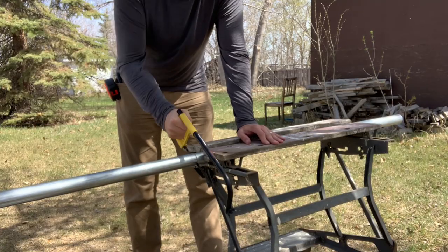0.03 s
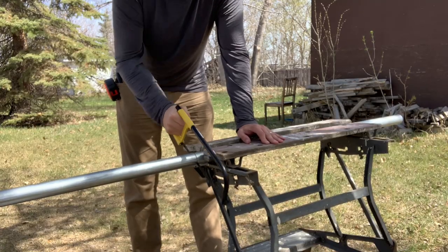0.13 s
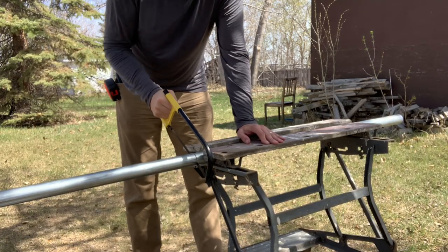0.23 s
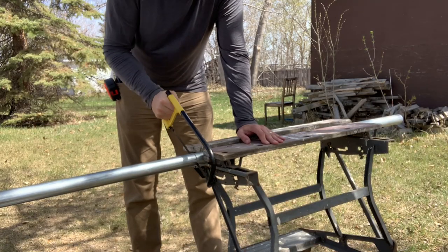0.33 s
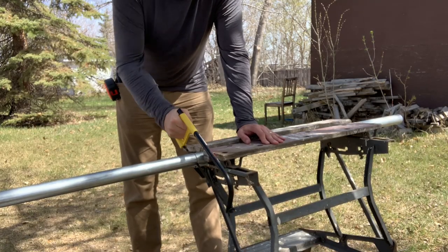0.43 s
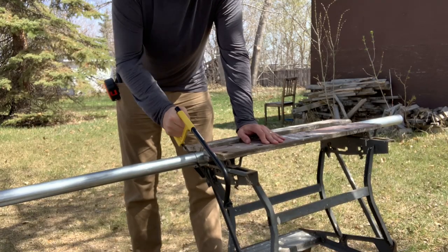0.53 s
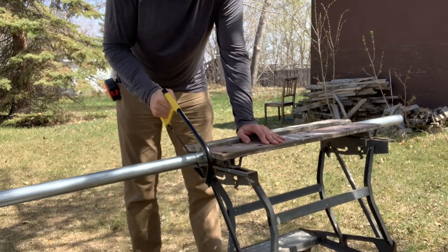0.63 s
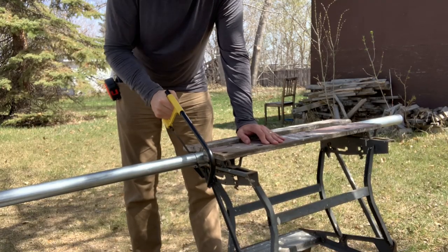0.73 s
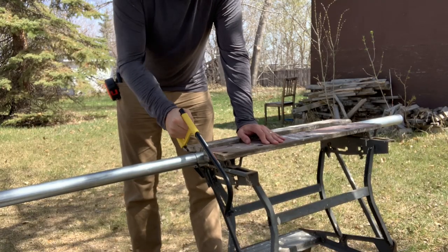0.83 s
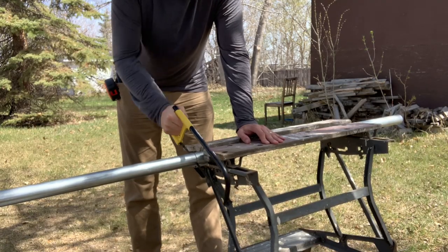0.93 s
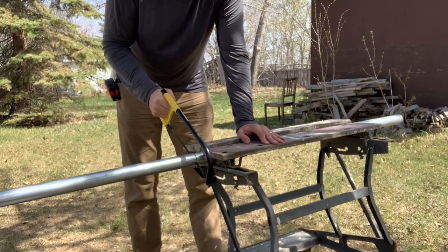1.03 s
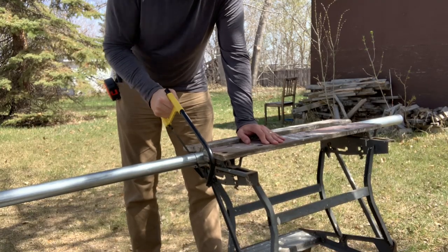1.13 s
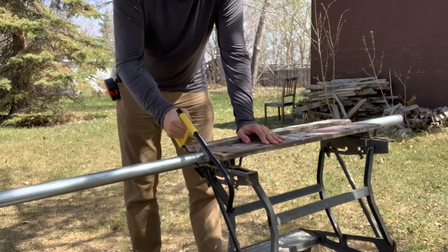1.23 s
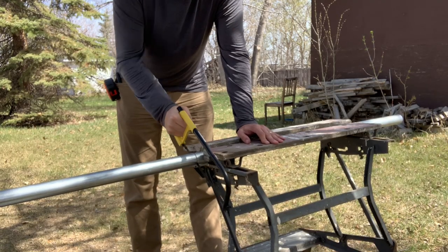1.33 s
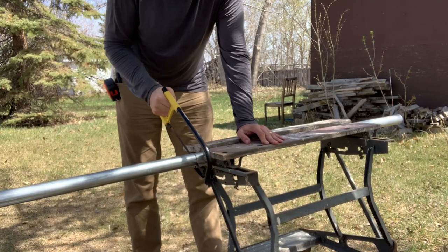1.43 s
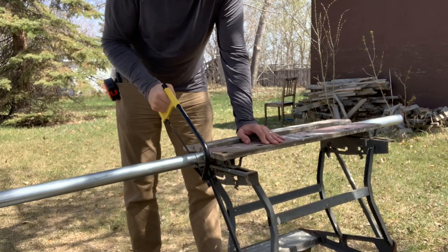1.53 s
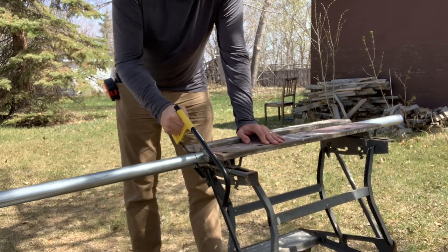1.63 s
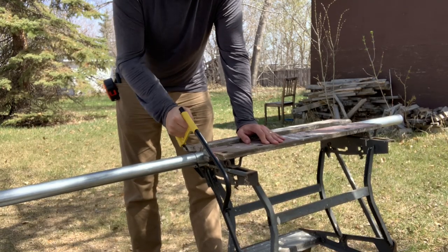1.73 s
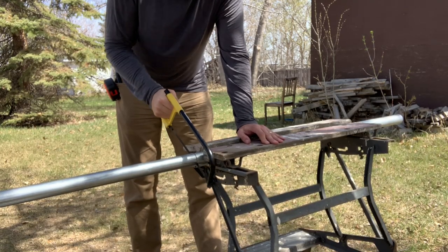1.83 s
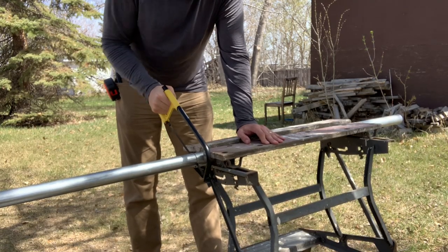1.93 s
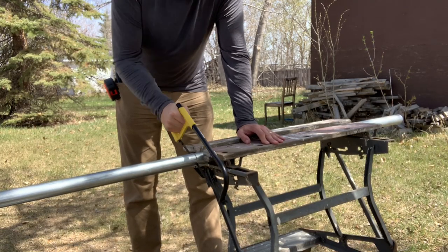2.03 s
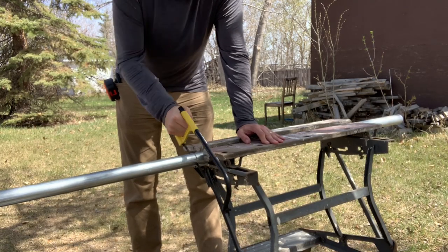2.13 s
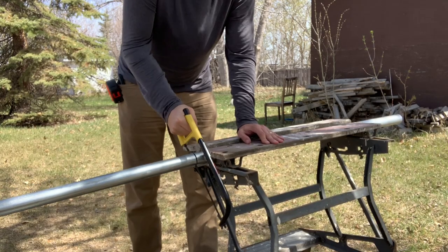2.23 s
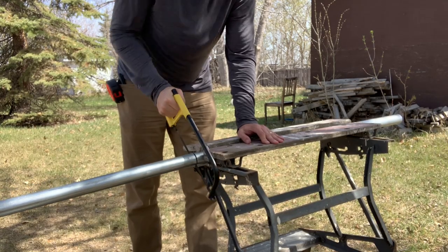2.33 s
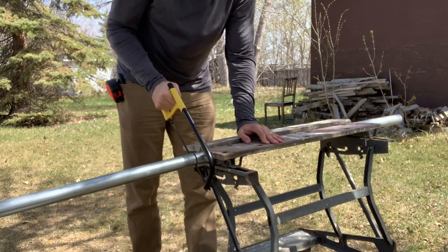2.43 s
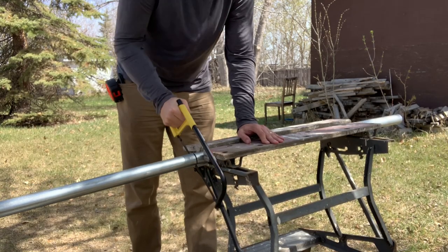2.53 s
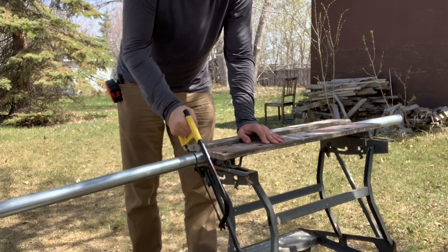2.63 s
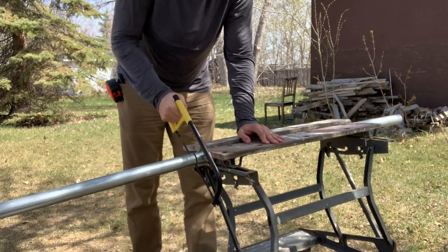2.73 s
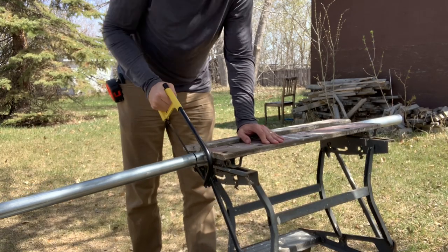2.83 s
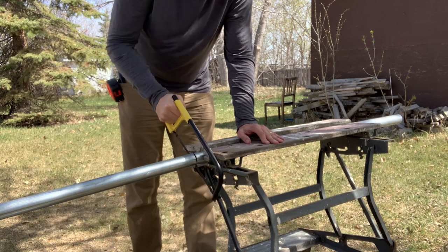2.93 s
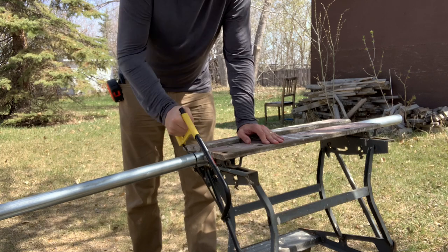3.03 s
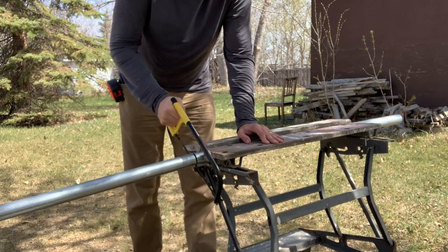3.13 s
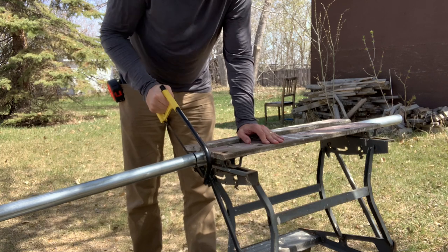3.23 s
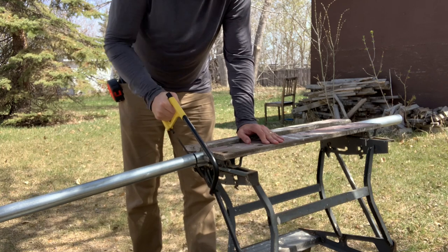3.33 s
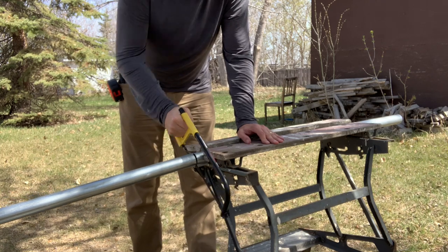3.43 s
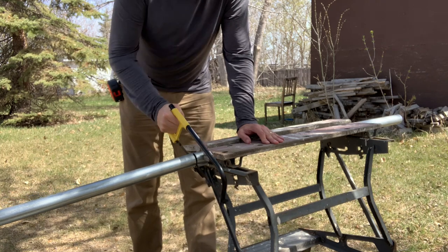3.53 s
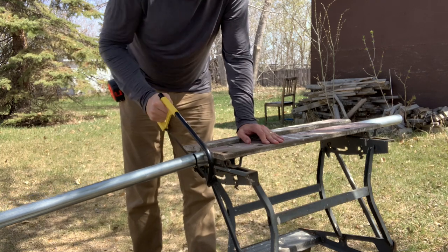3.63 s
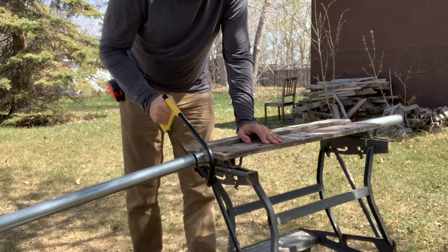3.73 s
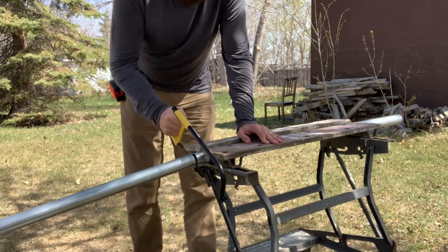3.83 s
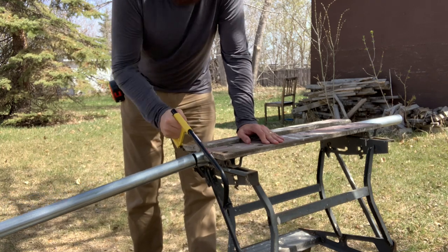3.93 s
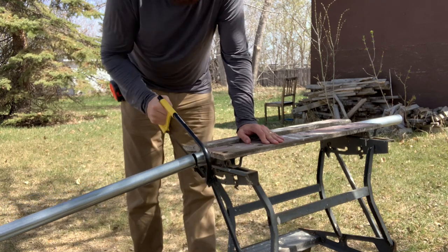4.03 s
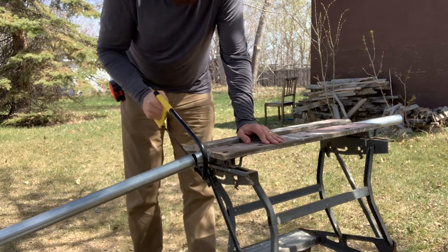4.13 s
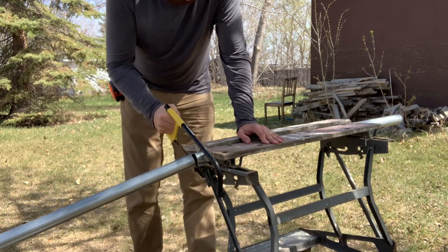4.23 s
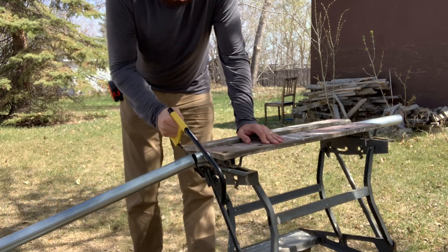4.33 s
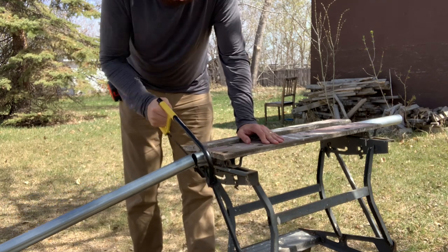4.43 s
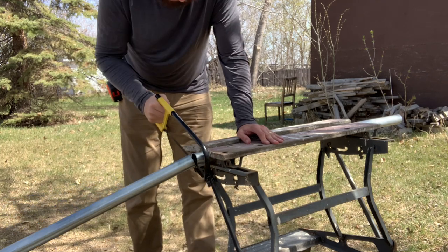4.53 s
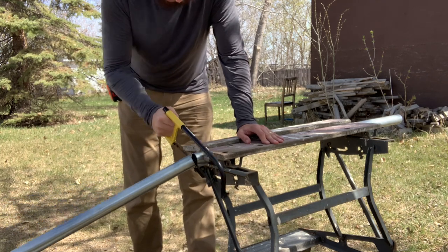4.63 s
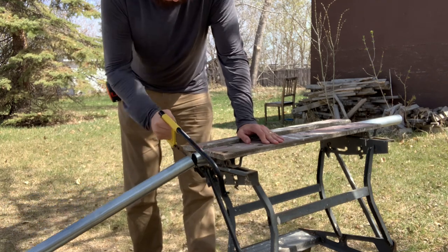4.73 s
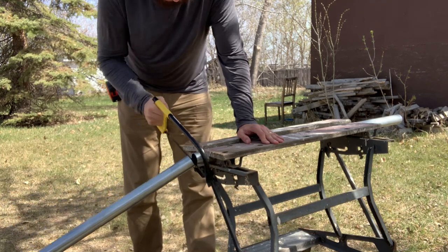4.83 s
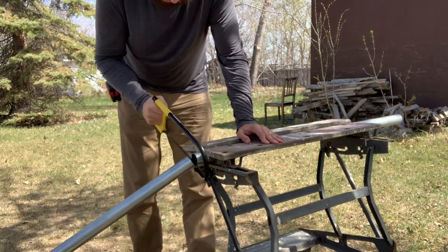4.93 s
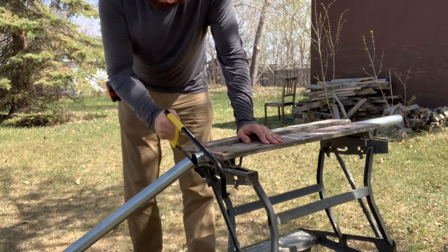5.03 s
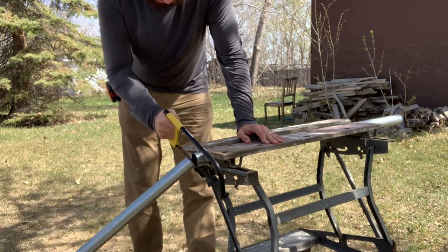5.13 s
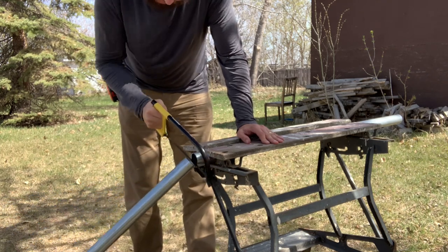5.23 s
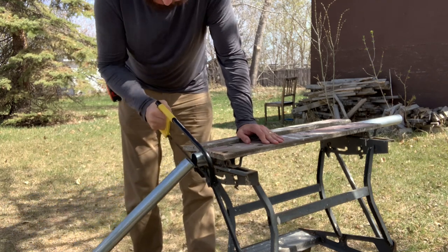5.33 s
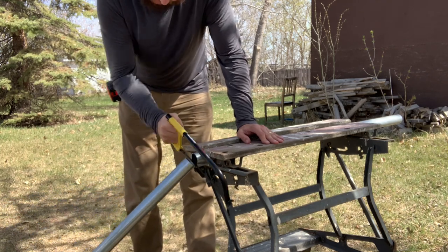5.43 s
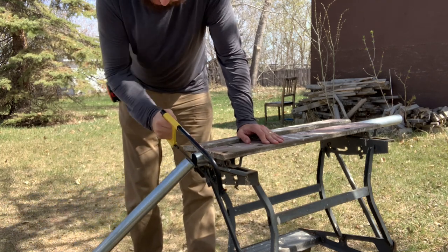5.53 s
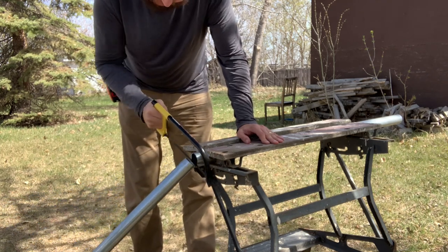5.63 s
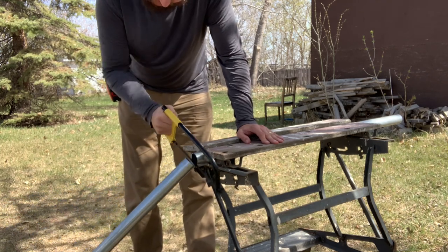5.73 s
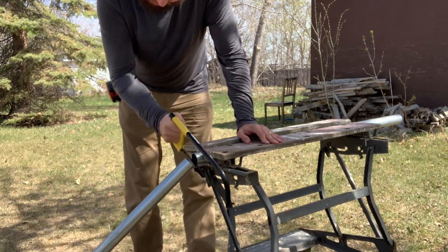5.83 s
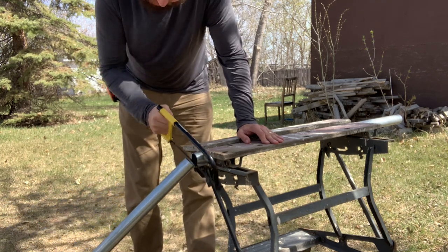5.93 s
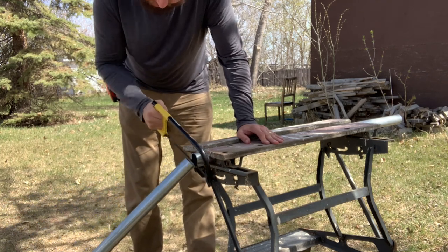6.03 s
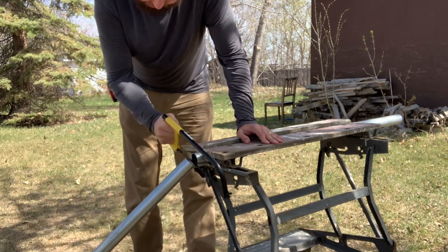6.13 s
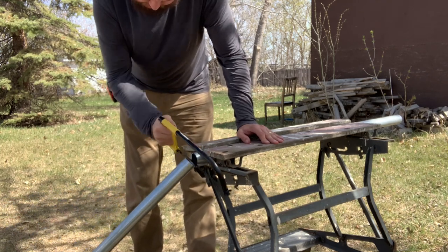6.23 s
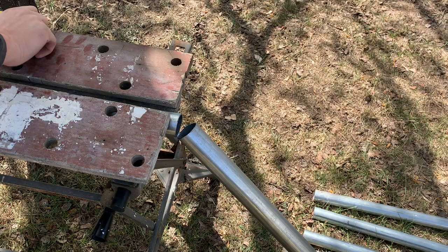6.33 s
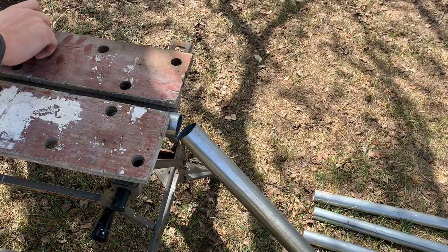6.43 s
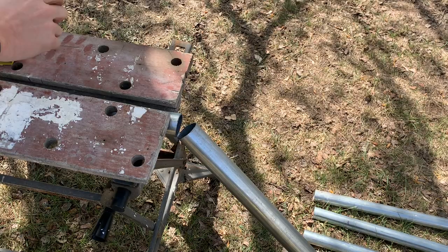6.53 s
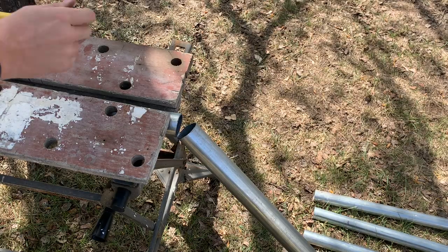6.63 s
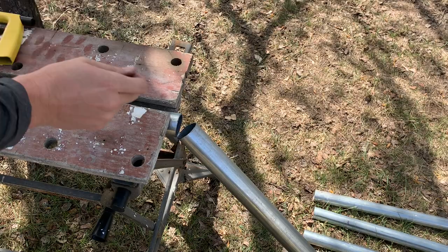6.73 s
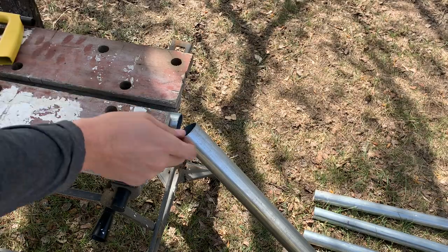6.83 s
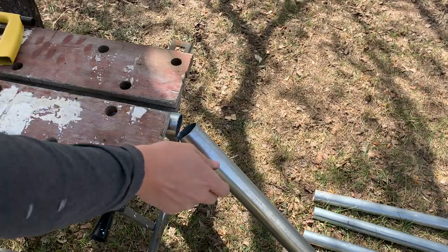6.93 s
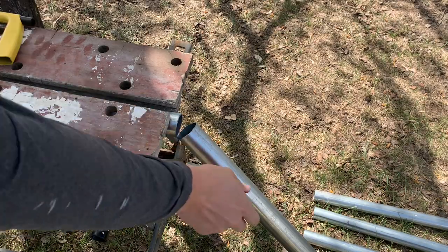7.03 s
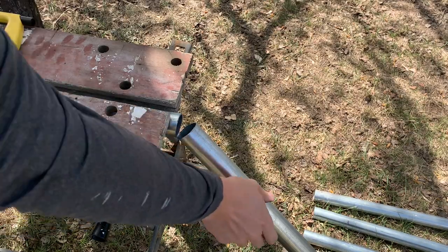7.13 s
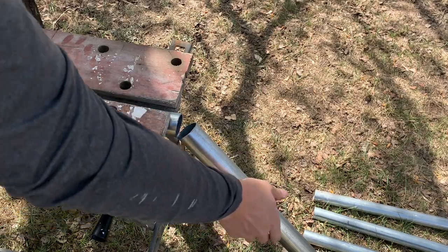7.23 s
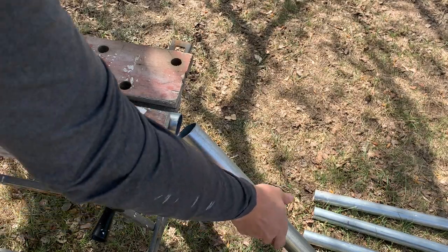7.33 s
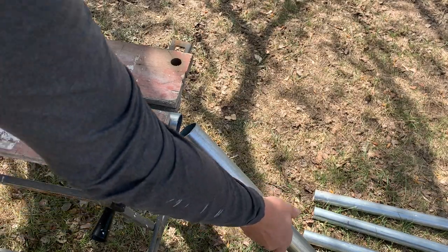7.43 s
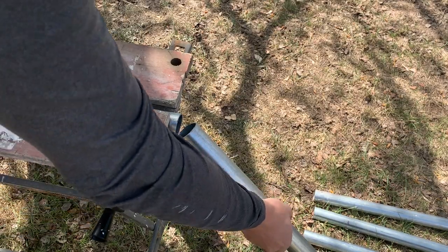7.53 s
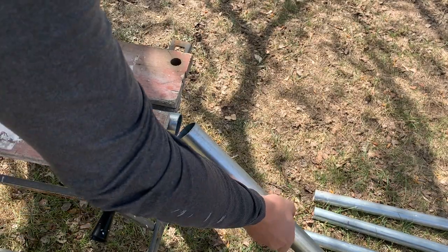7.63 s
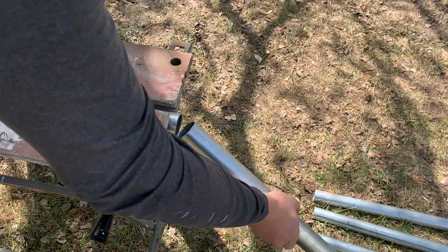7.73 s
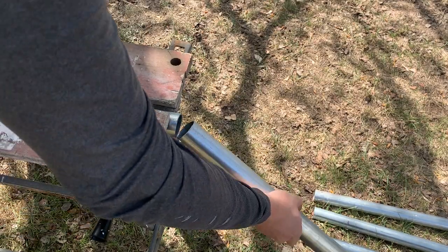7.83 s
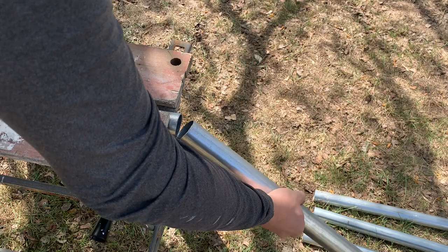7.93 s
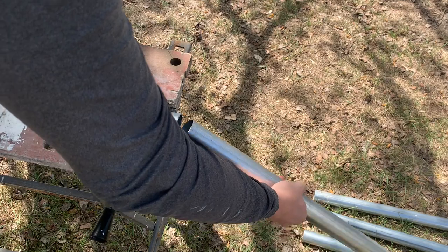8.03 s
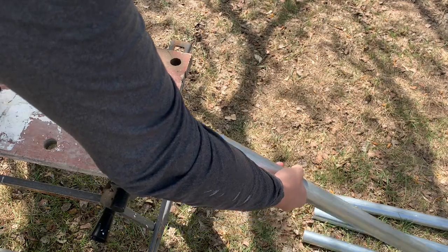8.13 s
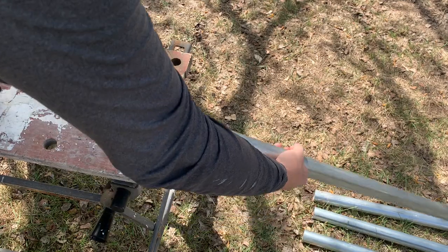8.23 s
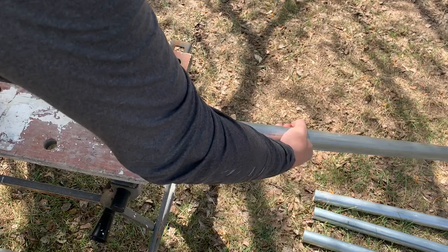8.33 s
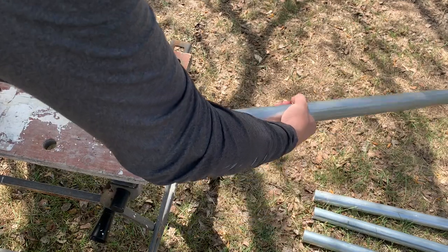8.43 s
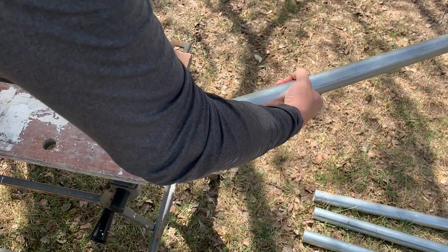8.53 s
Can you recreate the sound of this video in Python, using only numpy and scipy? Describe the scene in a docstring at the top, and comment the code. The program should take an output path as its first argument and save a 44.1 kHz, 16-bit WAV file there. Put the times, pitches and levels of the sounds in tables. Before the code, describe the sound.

Rapid metallic rasping fills the first six seconds, dry and close, slightly right of centre, with gritty catches and brief squeals around one kilohertz. Later strokes are softer but whinier. It stops abruptly in a rattling clunk on a wooden-topped bench. Then it is almost silent: low breeze puffs on the microphone, tiny knocks and sleeve rustle, a light pipe clink, and a hissing, groaning drag across dry grass.

```python
"""A hacksaw cuts a galvanized steel pipe on a folding workbench outdoors, about five strokes a second.
Each tooth tears a chip: noise pulsed at the tooth rate rings resonances of pipe, blade and cut lip.
Whine and squeals are sine tones. The pipe sags as the cut opens, then the saw drops through onto the bench:
bursts of noise and ringing steel legs. Last, the loose end clinks (decaying modes) and is dragged over
dry grass (filtered noise, gliding groans), in a light breeze of low, swelling noise."""
import sys
import numpy as np
from scipy import signal
from scipy.fft import rfft, irfft, next_fast_len
from scipy.io import wavfile
from scipy.ndimage import uniform_filter1d, map_coordinates

SR = 44100
rng = np.random.default_rng(int(sys.argv[2]) if len(sys.argv) > 2 else 0)


def put_to_file(sound):
    """Save the sound as 16-bit audio at rate SR, in the file named by the first command-line argument."""
    columns = np.atleast_2d(sound).T  # one column per channel
    safe = np.clip(columns, -1, 1)
    whole_steps = np.round(safe * 32767)
    wavfile.write(sys.argv[1], SR, whole_steps.astype(np.int16))


N = 378800
T = np.arange(N) / SR  # time axis, s
SIZE = next_fast_len(N + SR // 2, real=True)  # padded transform length
HZ = np.fft.rfftfreq(SIZE, 1 / SR)  # frequency axis

THROUGH_S, REST_S = 6.372, 6.44  # the blade breaks through; the arm comes to rest
LANDED_DB_PER_S = 90  # the bench damps the blade once the saw has dropped through
# the pipe sags: [t/s, how far the cut has opened 0-1]
CUT_OPENING = [(3.9, 0), (4.8, 1)]
# blade resonances in the cut: [f/Hz, width/Hz, relative level/dB]
BLADE_IN_CUT = [(2504, 5.1, 5), (2566, 37, 2), (2673, 22, -7), (7020, 40, -8.5)]
# free edge of the cut: [f/Hz, width/Hz, relative level/dB]
CUT_LIP = [(1900, 72, 3), (1960, 49, 7), (2050, 50, -12.5)]
# the blade's free length: [f/Hz, width/Hz, relative level/dB]
FREE_BLADE = [(2472, 11, 6), (2530, 15, 5), (4656, 8.6, -2.5), (4790, 7.1, -9), (6960, 18, -2.5)]
# lines of the tooth beat; teeth set in threes add lines between the harmonics:
# [multiple of the tooth rate, relative level/dB]
TOOTH_LINES = [(3 / 3, 0), (4 / 3, -13.5), (5 / 3, -11.5), (6 / 3, -9.5), (9 / 3, -15)]
# left-right likeness of sounds from the bench: [f/Hz, likeness -1..1]
BENCH_LIKENESS = [(100, .85), (600, .7), (1200, .75), (2500, .35), (3400, .55), (5000, .2), (6500, 0),
                  (7200, -.35), (8200, -.985), (10000, -.995), (11000, -.2), (12100, .55), (12800, .98),
                  (16000, .98)]
# share of the left-right difference that is a steady phase lead of the left: [f/Hz, share -1..1]
LEFT_LEAD = [(500, .4), (1100, -.3), (1550, -.65), (2150, -.45), (2410, .8), (2840, .5), (3960, -.3),
             (4650, .65), (5200, -.3), (6700, .7), (11000, .5)]


def saw(turn_db=21, bite=0.43, rasp_db=1.4, grumble_db=-61, blade_db=.5, sing_db=-5.5, lip_db=-15):
    """Teeth strike at a rate that follows the blade's speed; each tears a chip that rings pipe, blade and lip."""
    speed, push, level = arm()
    opened = np.clip(np.interp(T, *np.transpose(CUT_OPENING)), 0, 1)
    tooth_hz, whine, blade, lip = contact(push, opened)
    # the exponent sets how closely the force follows the speed
    slack = -turn_db * (1 - speed ** 0.98)
    force = amp(level) * np.clip((THROUGH_S - T) / 0.0046, 0, 1)
    tooth = teeth(speed, tooth_hz, whine)

    # chips tear off once a tooth, in uneven sizes
    pulses = np.exp(bite * np.cos(tooth)) * amp(.7 * wobble(70))
    chips = force * amp(snags()) * unit(pulses)
    cut = metal_grain() * chips * amp(slack + rasp_db)
    # a thin pipe radiates little bass
    cut = filtered(cut, causal(amp(along([(120, -9), (330, -6), (650, 0)]))))
    sound = filtered(cut * np.sqrt(1 - opened), pipe(0))
    sound += filtered(cut * np.sqrt(opened), pipe(1))
    sound += filtered(chips * noise() * amp(1.1 * slack + blade + blade_db), body(BLADE_IN_CUT))
    sound += filtered(chips * noise() * amp(1.1 * slack + lip + lip_db), body(CUT_LIP))

    # the rocking bench grumbles under the work
    rocking = body([(150, 120, -4.5), (270, 110, 2.5), (415, 160, -0.5)])
    sound += (T < THROUGH_S) * amp(grumble_db + 2 * wobble(13)) * filtered(noise(), rocking)

    # the taut blade keeps singing through the turns
    singing = filtered(chips * noise() * amp(0.24 * slack + blade + sing_db), body(FREE_BLADE))
    sound += singing * amp(-LANDED_DB_PER_S * np.maximum(T - THROUGH_S, 0))

    tones = np.array([tooth_whine(speed, tooth, force, slack, whine) + squeals(), np.zeros(N)])
    tones = scatter(tones, t60=0.093, wet_db=-6.5)
    return stereo(sound + tones, BENCH_LIKENESS, along(LEFT_LEAD))


# pushes and pulls in turn, a push first: [start t/s, fastest t/s, level/dB]
SAW_STROKES = [(-.09, .006, -27.5), (.102, .185, -28), (.288, .408, -26.5), (.498, .621, -25.5),
               (.702, .773, -24.5), (.894, .989, -27), (1.105, 1.198, -25.5), (1.317, 1.42, -24.5),
               (1.525, 1.595, -25), (1.724, 1.808, -27), (1.924, 2.034, -25.5), (2.139, 2.19, -30),
               (2.244, 2.345, -28), (2.445, 2.561, -30), (2.659, 2.778, -31), (2.87, 2.963, -30),
               (3.074, 3.146, -25), (3.287, 3.39, -28.5), (3.493, 3.577, -27.5), (3.725, 3.857, -32.5),
               (3.928, 4.034, -29), (4.146, 4.225, -30.5), (4.333, 4.44, -33), (4.544, 4.624, -33.5),
               (4.734, 4.86, -29.5), (4.936, 5.029, -29.5), (5.115, 5.205, -32.5), (5.308, 5.384, -30),
               (5.485, 5.578, -33), (5.685, 5.769, -31.5), (5.862, 5.968, -32), (6.045, 6.124, -34.5),
               (6.225, 6.31, -29.5)]


def arm():
    """Blade speed 0-1, zero at every turn; whether it is a push (1) or a pull (0); the stroke's level in dB."""
    start, fastest, level = np.transpose(SAW_STROKES)
    marks = np.append(np.column_stack([start, fastest]), REST_S)
    quarter_cycles = np.interp(T, marks, np.arange(len(marks)))
    speed = np.abs(np.sin(np.pi / 2 * quarter_cycles))
    stroke = np.maximum(np.searchsorted(start, T, side="right") - 1, 0)
    push = uniform_filter1d(1. - stroke % 2, size=700)
    return speed, push, uniform_filter1d(level[stroke], size=700)


# tooth rate at full speed when the work starts; the arm slows as it goes on
PUSH_HZ, PULL_HZ, SLOWING_HZ_PER_S = 1294, 1151.1, 14
BITE_DB, BITE_S = 4, 0.01483  # the teeth bite most evenly at full speed: extra whine, half length
BLADE_FADE_DB_PER_S, BLADE_PUSH_DB = 1.75, 1.5  # the deepening cut damps the blade; it rings more on a push
LIP_OPENS_DB = 13  # the lip rings more once the cut is open
# whine against the stroke level, before the bite and slack of each stroke; strongest on the pulls
# while the sagging pipe holds the cut open: [t/s, push level/dB, pull level/dB]
WHINE_COURSE = [(0, -10, -8.5), (2, -8.5, -7), (3.6, -6.5, -6), (4.3, -5, 1), (5.78, -8, 2),
                (6.08, -12, -10)]


def contact(push, opened):
    """Tooth rate and the dB of whine, blade and lip, from the stroke's direction and the state of the cut."""
    tooth_hz = PULL_HZ + (PUSH_HZ - PULL_HZ) * push - SLOWING_HZ_PER_S * T
    s, pushed, pulled = np.transpose(WHINE_COURSE)
    whine = push * np.interp(T, s, pushed) + (1 - push) * np.interp(T, s, pulled)
    whine += BITE_DB * sum(swell(fastest, BITE_S) for _, fastest, _ in SAW_STROKES)
    blade = BLADE_PUSH_DB * push - BLADE_FADE_DB_PER_S * T
    return tooth_hz, whine, blade, LIP_OPENS_DB * opened


def teeth(speed, tooth_hz, whine, jitter=0.04477):
    """Phase of the tooth beat: even when the teeth bite well, ragged when they skate."""
    ragged = np.interp(whine, [-8, 4], [1.15, .35])
    # the arm is soon up to speed and brakes more gradually
    curve = np.where(np.gradient(speed) > 0, .45, .55)
    unsteady = 1 + ragged * (jitter * wobble(400) + .04 * wobble(45))
    return 2 * np.pi * np.cumsum(tooth_hz * speed ** curve * unsteady) / SR


# a tooth stalls, catches, and the rasp jumps: [t/s, extra level/dB before the fade]
TOOTH_CATCHES = [(0.347, 7.5), (.743, 5), (1.132, 6.5), (1.339, 5), (1.608, 1.5), (1.945, 2.5), (2.684, 7),
                 (3.113, 10.5), (3.746, 11), (4.77, 4), (4.994, 6)]


def snags(rise=.002, fall=.035, stall=.8):
    """Extra dB of rasp: a tooth holds the blade back, bites all at once and lets go slowly."""
    extra = np.zeros(N)
    for s, db in TOOTH_CATCHES:
        caught = (1 + np.tanh((T - s) / rise)) / 2
        extra += db * np.exp(-np.abs(T - s) / fall) * ((1 + stall) * caught - stall)
    return extra


def metal_grain():
    """Countless standing waves in the long pipe give the rasp a metallic grain, denser in the treble."""
    crowded = along([(900, 0), (3000, 1)])
    waves = filtered(unit(scatter(noise(), t60=.13, wet_db=0)), np.sqrt(crowded))
    plain = filtered(noise(), np.sqrt(np.abs(1 - crowded)))
    return shifting(waves + plain, depth_db=3.2)


def shifting(x, depth_db):
    """The contact slides along the blade, so patches of the spectrum swell and fade."""
    z = signal.stft(x, nperseg=512)[2]
    field = rng.standard_normal(z.shape[1:])
    field = uniform_filter1d(uniform_filter1d(field, size=3, axis=0), size=7, axis=1)
    gain = unit(amp(depth_db * unit(field)))
    return signal.istft(z * gain, nperseg=512)[1][:, :N]


# rasp of steel on steel: [f/Hz, level/dB with the cut tight, level/dB with the cut open], relative
STEEL_RASP = [(60, -31.5, -30.5), (203, -6, -9.5), (420, -5.5, -7.5), (760, -0.5, 0.5), (1180, 2, 7),
              (1600, 1, 6), (2190, 2, 2.5), (2940, 2, -3), (4700, 2, -1.5), (6000, 0, -2.5),
              (8300, -1.5, -5), (11600, -2.5, -4.5), (14300, -6, -6), (15800, -3.5, -8)]
# pipe resonances: [f/Hz, width/Hz, level/dB over the rasp with the cut tight, with the cut open]
PIPE_MODES = [(1013, 13, 8.5, 5.5), (1263.4, 17, 12.5, 10.5), (2703, 45, 13.5, 18), (2810, 68, 8.5, 10.5),
              (2910, 43, 11.5, -5), (3024, 18, 10, 15.5), (3150, 25, -10.5, 4.5), (3425, 120, 6.5, 10),
              (3720, 45, 5.5, -10), (3833, 30, 4.5, 15.5), (4705, 20, 9, -9), (4706, 45, 7, 16.5),
              (5350, 230, -9, 7), (5730, 46, -7.5, 10), (5935, 78, 7.5, -6), (7110, 130, 18.5, 11.5),
              (8060, 57, 12, -14), (7840, 25, -7, 16), (9020, 60, -14.5, -13.5), (11570, 43, 1, -2.5),
              (12080, 30, 6.5, 0.5), (13585, 160, 15, -8.5), (14600, 44, 5, -13.5)]


def pipe(state):
    """Response of the pipe with the cut tight (0) or open (1): resonances on the rasp, levelled in the treble."""
    peaks = sum(amp(db[state]) ** 2 / (1 + (2 * (HZ - hz) / width) ** 2) for hz, width, *db in PIPE_MODES)
    rasp = amp(along([(hz, db[state]) for hz, *db in STEEL_RASP]))
    gain = rasp * np.sqrt(1 + peaks)
    treble = (HZ > 3000) & (HZ < 12000)
    return causal(gain / np.sqrt(np.mean(gain ** 2 * treble)))


def tooth_whine(speed, tooth, force, slack, whine):
    """The beat of the teeth is an arching whine, strongest once the blade has settled into the stroke."""
    settled = np.where(np.gradient(speed) > 0, 1.75, 1.3)
    beat = sum(amp(db) * np.sin(multiple * tooth) for multiple, db in TOOTH_LINES)
    beat = unit(beat * amp(2.7 * wobble(130)))
    beat = beat * force * amp(settled * slack + whine)
    return filtered(beat, amp(along([(450, -14), (700, -3), (1000, -.5)])))


SQUEAL_DB, SQUEAL_OCTAVE_DB = -3.5, -10  # trim of all squeals; octave against the fundamental
SQUEAL_RISE_S, SQUEAL_HOLD_S, SQUEAL_T60_S = 0.0044, .018, .12  # the hold counts from the start of the rise
# the teeth lock onto a resonance of the pipe and squeal: [t/s at full level, level/dB before trim, f/Hz]
PIPE_SQUEALS = [(0.7844, -18, 1262), (1.1944, -18.5, 1264), (1.6083, -7.5, 1310), (2.014, -23, 1140),
                (2.314, -23.5, 1223), (4.0126, -22, 1112), (4.2157, -14.5, 1003), (4.6144, -21.5, 1010),
                (4.778, -24.5, 1193), (4.9965, -12.5, 1024)]


def squeals(waver=.012):
    """Short, slightly unsteady tones with their octave: attack, hold, release."""
    sound = np.zeros(N)
    drift = np.cumsum(1 + waver * wobble(200)) / SR
    for s, db, hz in PIPE_SQUEALS:
        age = np.maximum(T - s + SQUEAL_RISE_S, 0)
        release_db = -60 * np.maximum(age - SQUEAL_HOLD_S, 0) / SQUEAL_T60_S
        level = amp(db + SQUEAL_DB + release_db) * np.minimum(age / SQUEAL_RISE_S, 1)
        phase = 2 * np.pi * hz * drift
        sound += level * (np.sin(phase) + amp(SQUEAL_OCTAVE_DB) * np.sin(2 * phase))
    return sound


# the saw lands, the bench is jostled: [t/s, level/dB, t60/s]
BENCH_KNOCKS = [(6.37, -26, 0.16), (6.405, -27, 0.16), (6.874, -48.5, 0.14), (6.927, -61, 0.32),
                (7.014, -53, .05), (7.616, -40, 0.12)]
# resonances of the bench: [f/Hz, width/Hz, relative level/dB]
BENCH_MODES = [(84.7, 30, -11.5), (216, 81, -8), (367, 50, 0), (450, 49, -1), (637, 52, -1), (840, 60, -4),
               (1290, 130, -12.5), (1993, 270, -22), (3600, 1200, -32.5)]
# the bench's steel legs: [f/Hz, level/dB, t60/s]
STEEL_LEGS = [(370, -41, .5), (646, -47, .8), (838, -48, .8), (1044, -50, .3), (1200, -54, .3),
              (2519, -69, .5)]


def bench():
    """Rattling blows on the wooden top; the second, as the saw lands, leaves the steel legs ringing."""
    blows = np.zeros(N)
    for s, db, t60 in BENCH_KNOCKS:
        attack = np.clip((T - s) / 0.0022 + 1, 0, 1)
        blows += amp(db - 60 * np.maximum(T - s, 0) / t60) * attack
    top = stereo(filtered(blows * noise(), body(BENCH_MODES)), BENCH_LIKENESS)
    return top + ringing(BENCH_KNOCKS[1][0], STEEL_LEGS)


CLINK_S = 7.619  # the loose end clinks against the stub
DRAG_S, DRAG_RISE_S = 7.83, 0.37  # the pipe starts to slide and gathers speed
HOLLOW_RISE_S, HOLLOW_FADE_DB_PER_S = .15, 12  # its body sounds sooner, then less as it is lifted
# the cut ends touch: [f/Hz, relative level/dB, t60/s]
CLINK_MODES = [(436, -4, .3), (1168, 0, .17), (2471, -1, .55), (2600, -1, .45), (3747, -6, .48),
               (4613, -11, .38), (5685, -8, .2), (7940, -14, .22), (9668, -13, .22), (11020, -13, .2)]
# spectrum of the slide over dry grass: [f/Hz, relative level/dB]
GRASS_SCRAPE = [(200, -24.5), (400, -6), (800, -8.5), (1100, 1), (1800, -1), (2600, 0), (3600, -7.5),
                (5200, -12), (7200, -10.5), (9000, -21), (13500, -16.5), (15800, -26.5)]
# hollow body of the dragged pipe: [f/Hz, width/Hz, relative level/dB]
HOLLOW_PIPE = [(298, 22, 1), (390, 60, -2.5), (480, 92, -4.5), (638, 70, -5), (786, 46, -8.5),
               (1063, 49, -10.5)]
# the dragged pipe sticks and slips: [t/s, half length/s, f/Hz, glide/Hz per s, level/dB]
STICK_SLIP_GROANS = [(7.978, 0.04, 396.6, 250.5, -36.5), (8.327, 0.02, 636, -400, -42.5)]
# a sleeve brushes past: [t/s, half length/s, level/dB]
SLEEVE_RUSTLES = [(6.927, 0.018, -63), (6.989, .02, -70.5), (7.349, 0.03604, -73.5), (7.554, 0.022, -76)]


def offcut(tick_db=-54, clink_db=-54, scrape_db=-48, hollow_db=-46, ring_db=-53, jerk_db=1.3, grain_db=1.1,
           lag_s=.00018):
    """A sleeve rustles; the loose length clinks against the stub, then slides over grass, hissing and groaning."""
    tick = (T > CLINK_S) * amp(tick_db - 60 * np.abs(T - CLINK_S) / 0.067) * noise()
    clink = amp(clink_db) * ringing(CLINK_S, CLINK_MODES)
    age = np.maximum(T - DRAG_S, 0)

    def slide(db, rise):
        """Level of the drag, easing in from its start."""
        return amp(db) * np.sin(np.pi / 2 * np.minimum(age / rise, 1)) ** 2

    ring = filtered(noise(), body([(2460, 45, 0.5), (2760, 70, -7.5)])) * slide(ring_db, DRAG_RISE_S)
    rub = slide(scrape_db, DRAG_RISE_S) * amp(jerk_db * wobble(28))
    # the rustles share the spectrum of the scrape
    rub += sum(amp(db) * swell(at, half) for at, half, db in SLEEVE_RUSTLES)
    hiss = unit(filtered(noise() * amp(grain_db * wobble(300)), amp(along(GRASS_SCRAPE)))) * rub
    tube = filtered(noise(), body(HOLLOW_PIPE)) * slide(hollow_db - HOLLOW_FADE_DB_PER_S * age, HOLLOW_RISE_S)
    groan = np.zeros(N)
    for at, half, hz, glide, db in STICK_SLIP_GROANS:
        pitch = hz + glide * (T - at) + 10 * wobble(120)
        groan += amp(db) * swell(at, half) * np.sin(2 * np.pi * np.cumsum(pitch) / SR)
    sound = stereo(tick + hiss + tube + ring, [(500, .92), (2000, .65), (5000, .3), (8200, 1.0)])
    sound = sound + groan + clink
    # it lies to the right, so it reaches the left later by lag_s
    return filtered(sound, np.exp(-1j * np.pi * np.outer([1, -1], HZ * lag_s)))


# the breeze freshens: [t/s, half length/s, level/dB]
BREEZE_GUSTS = [(.98, .06, -50.5), (1.374, .025, -40), (5.02, .025, -48), (6.396, 0.0376, -43),
                (6.523, .06, -43), (6.675, .07, -45)]
# spectrum of the puffs: [f/Hz, relative level/dB]
BREEZE_RUMBLE = [(15, -25.5), (30, -14), (52, 5), (90, -1), (150, -11), (260, -26.5), (600, -64)]
# spectrum of the yard's hush: [f/Hz, relative level/dB]
YARD_HUSH = [(60, -16.5), (250, -1.5), (500, -5.5), (900, -12), (1500, -24), (3000, -30), (7000, -34),
             (15000, -33)]


def air(breeze_db=-59.5, flutter_db=3.4, yard_db=-66):
    """Puffs of breeze on the microphone over the faint hush of the yard, both shaped noise."""
    breeze = amp(breeze_db + flutter_db * wobble(7.9))
    breeze += sum(amp(db) * swell(s, half) for s, half, db in BREEZE_GUSTS)
    puffs = unit(filtered(noise(), amp(along(BREEZE_RUMBLE)))) * breeze
    hush = unit(filtered(noise(), amp(along(YARD_HUSH)))) * amp(yard_db + 1.0 * wobble(1.8))
    return stereo(puffs + hush, [(50, .75), (500, 1.0), (3000, 0.17)])


def amp(db):
    """Decibels to gain."""
    return 10 ** (np.asarray(db) / 20)


def unit(x):
    """x at rms 1."""
    return x / np.sqrt(np.mean(np.abs(x) ** 2) + 1e-20)


def along(points):
    """(Hz, value) points joined on a log axis."""
    hz, value = np.transpose(points)
    return np.interp(np.log(HZ + 1), np.log(hz), value)


def wobble(rate):
    """A smooth random curve, rate knots a second."""
    return map_coordinates(rng.standard_normal(int(N * rate / SR) + 4), [T * rate])


def swell(at, half):
    """A bell-shaped rise and fall around a moment."""
    return np.exp(-((T - at) / half) ** 2 / 2)


def noise():
    """Two unrelated white noises."""
    return rng.standard_normal((2, N))


def filtered(x, response):
    """x through a frequency response."""
    return irfft(rfft(x, SIZE) * response, SIZE)[..., :N]


def causal(gain):
    """The response with this gain that rings only after it is struck (minimum phase)."""
    cepstrum = irfft(np.log(np.maximum(gain, 1e-6)), SIZE)
    cepstrum[1:SIZE // 2] *= 2
    cepstrum[SIZE // 2 + 1:] = 0
    return np.exp(rfft(cepstrum))


def body(modes):
    """Response of (Hz, width, dB) resonances that keeps the power of white noise."""
    response = 0
    for k, (hz, width, db) in enumerate(modes):
        damping = 1j * HZ * width
        # alternate signs
        response = response + (-1) ** k * amp(db) * damping / (hz * hz - HZ ** 2 + damping)
    return unit(response)


def ringing(s, modes):
    """Slightly unsteady (Hz, dB, t60) modes struck at time s."""
    age = np.maximum(T - s, 0)
    tones = sum(amp(db - 60 * age / t60) * np.sin(2 * np.pi * hz * age + wobble(35)) for hz, db, t60 in modes)
    return (T > s) * tones


def stereo(pair, alike, lead=0):
    """Two unrelated signals blended into left and right of a given likeness and phase lead."""
    turn = np.arccos(np.clip(along(alike), -.999, .999)) / 2
    mid = filtered(pair[0], np.cos(turn))
    side = filtered(pair[0], 1j * lead * np.sin(turn))
    side += filtered(pair[1], np.sqrt(1 - lead ** 2) * np.sin(turn))
    return np.array([mid + side, mid - side])


def scatter(x, t60, wet_db):
    """Short dense answers of bench, wall and ground, different in each channel."""
    t = np.arange(SR // 4) / SR
    tail = rng.standard_normal((2, len(t))) * amp(-60 * t / t60)
    tail /= np.linalg.norm(tail, axis=1, keepdims=True)
    return x + amp(wet_db) * signal.fftconvolve(x, tail, axes=1)[:, :N]


# placing of saw and bench: [f/Hz, left minus right level/dB]
WORK_BALANCE = [(150, -.5), (600, -1), (1200, -3.8), (2000, -4.2), (2700, -3.6), (3500, -1.5), (6000, -1.2),
                (7100, -2.5), (7900, 0)]


def scene():
    """Saw and bench stand a little to the right, with a faint answer from the yard."""
    work = filtered(saw() + bench(), amp(np.outer([.5, -.5], along(WORK_BALANCE))))
    return scatter(work, t60=.25, wet_db=-56.5) + offcut() + air()


def record(dry):
    """Nothing is kept above the band limit."""
    return filtered(dry, HZ < 15850)


dry = scene()
out = record(dry)
put_to_file(out)
```